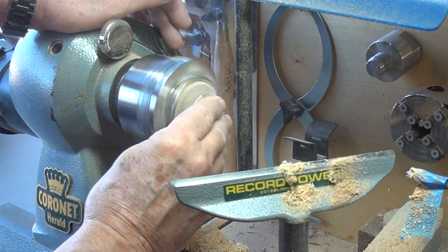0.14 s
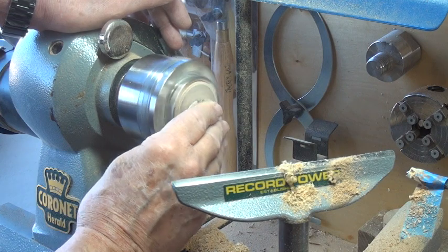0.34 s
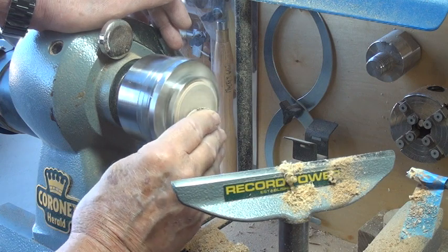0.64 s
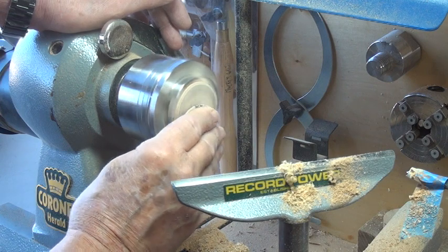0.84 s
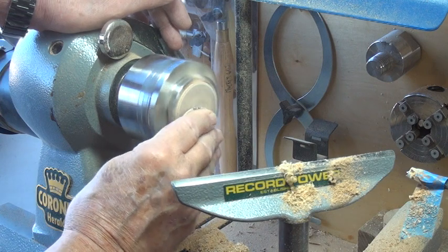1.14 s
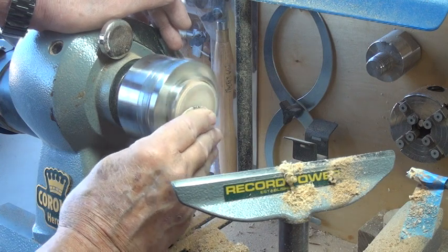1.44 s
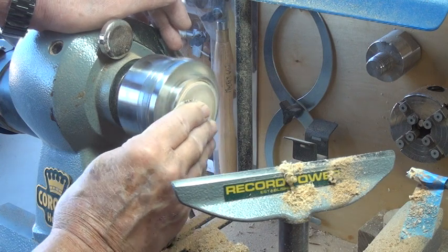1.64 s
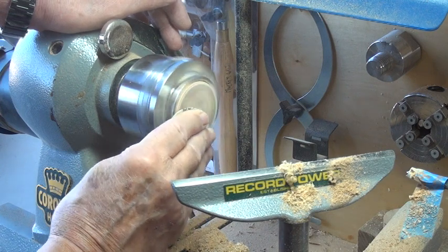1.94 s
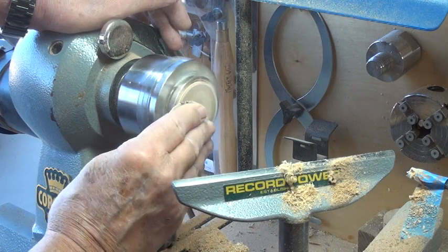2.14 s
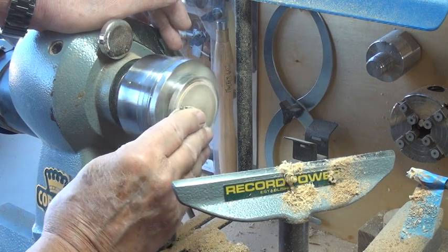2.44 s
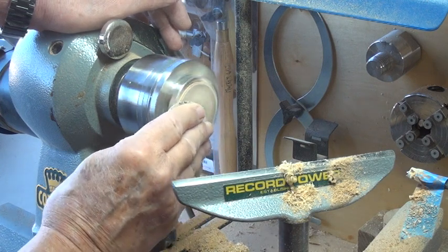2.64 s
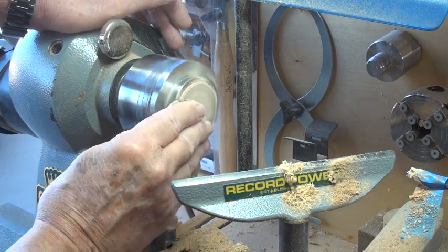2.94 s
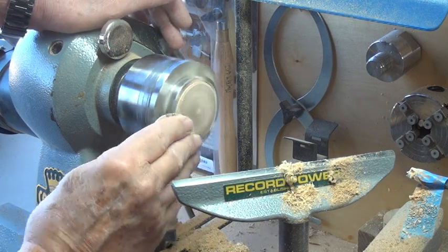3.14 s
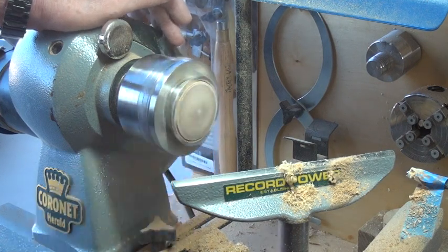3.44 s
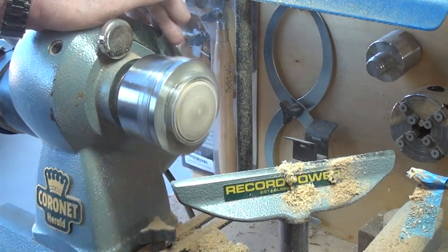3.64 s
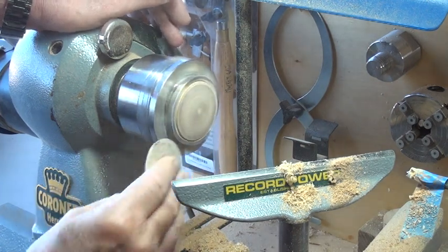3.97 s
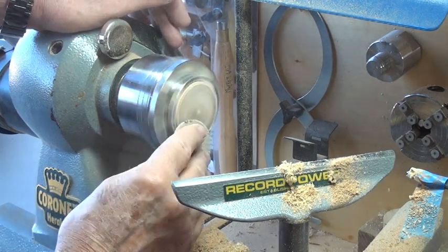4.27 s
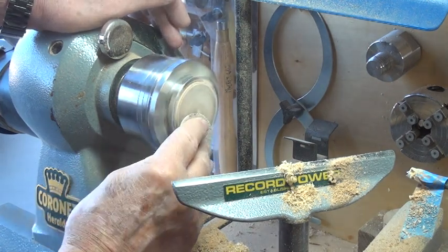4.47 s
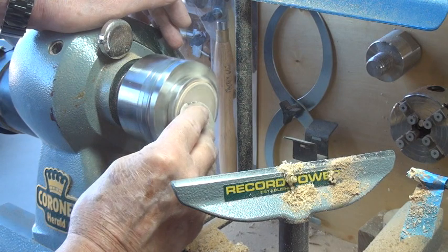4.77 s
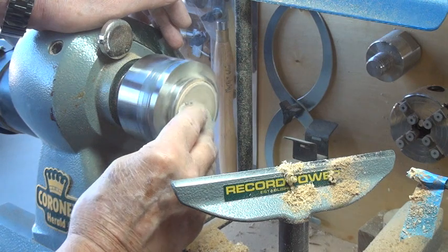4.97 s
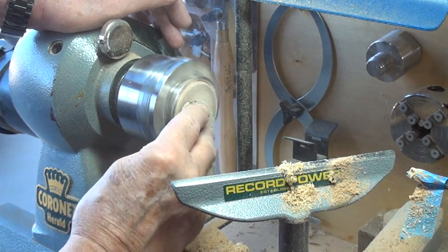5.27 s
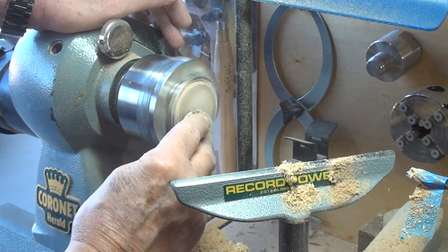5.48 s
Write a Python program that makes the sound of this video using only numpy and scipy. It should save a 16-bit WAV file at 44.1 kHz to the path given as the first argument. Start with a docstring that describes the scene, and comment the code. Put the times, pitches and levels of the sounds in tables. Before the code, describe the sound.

A wood lathe runs for the whole five and a half seconds or so, close and nearly straight ahead in a workshop with slight reflections. Its steady motor hum mixes with a fast belt throb, a rush of bearings, a light buzz and a thin, very high whistle. From the start, sandpaper scrapes against the spinning wood with a bright, dry hiss. It rasps harder and catches briefly on the grain right at the beginning, around 0.8 to 1.6 seconds, near 2.6 seconds and again at 3.1 seconds. At about 3.2 seconds the paper lifts off and only the lathe is heard, its pitch barely changing. At about 4.3 seconds the paper comes back with a slightly higher, more ringing hiss, swelling gently a few times and continuing to the end.

```python
"""Sanding wood on a lathe

A hand holds abrasive paper against a small piece of wood spinning on a belt-driven lathe. The motor hums
at harmonics of its shaft speed, its brushes buzz and its controller whistles; belt slaps and rolling
bearings excite the iron headstock. Grit snapping on wood fibres drives the resonances of the paper,
which scrapes on, is pressed harder a few times, lifts off for a second and comes back."""
import sys
import numpy as np
from scipy import signal
from scipy.fft import rfft, irfft, next_fast_len
from scipy.io import wavfile

SR = 44100
rng = np.random.default_rng(int(sys.argv[2]) if len(sys.argv) > 2 else 0)


def generate_wav(signal):
    """Clip the signal to [-1, 1] and save it as 16-bit WAV at the path in sys.argv[1]."""
    frames = np.transpose(np.atleast_2d(signal))
    scaled = np.clip(frames, -1, 1) * 32767
    pcm = np.round(scaled).astype(np.int16)
    wavfile.write(sys.argv[1], SR, pcm)


N = 247401
T = np.arange(N) / SR
HZ = np.fft.rfftfreq(N, 1 / SR)
MOTOR_HZ, SPINDLE_HZ, BELT_LAP_S = 25.387, 30.4, .2724


def amp(db):
    """Amplitude ratio of a level in decibels."""
    return 10 ** (np.asarray(db) / 20)


def unit_rms(x):
    """Normalisation to an rms of 1."""
    return x / np.sqrt(np.mean(x ** 2) + 1e-20)


def spectrum(points):
    """Spectral envelope: (Hz, dB) points interpolated over log frequency."""
    hz, db = np.transpose(points)
    return amp(np.interp(np.log(HZ + 1), np.log(hz), db))


def resonances(rows):
    """Power sum of steep-skirted peaks, each given as (Hz, width in Hz, dB)."""
    peaks = (amp(db) / (1 + ((HZ - hz) / width) ** 2 * np.sqrt(np.e)) for hz, width, db in rows)
    return np.sqrt(sum(peak ** 2 for peak in peaks))


def colour(drive, gain):
    """Source and filter: a white drive of rms 1 takes on the given level per Hz."""
    return irfft(rfft(drive) * gain, N) * np.sqrt(SR / 2)


def wander(rate_hz):
    """Low-pass noise of rms 1: a random fluctuation up to about the given rate."""
    t = np.arange(0, N / SR + 1, 1 / 1000)
    hz = np.fft.rfftfreq(len(t), t[1])
    lowpass = np.exp(-(hz / rate_hz) ** 2) * (hz > 0)
    slow = irfft(rfft(rng.standard_normal(len(t))) * lowpass, len(t))
    return unit_rms(np.interp(T, t, slow))


def tone(cycles, db):
    """A sinusoid of given rms level and random phase that follows a running count of cycles."""
    return amp(db) * np.sqrt(2) * np.sin(2 * np.pi * (cycles + rng.random()))


def swell(t, half_width):
    """Gaussian envelope of height 1 around t = 0."""
    return np.exp(-(t / half_width) ** 2)


def stroke(start, end, attack_s, decay_s):
    """Linear attack, a hold until the end, then exponential decay."""
    return np.clip((T - start) / attack_s, 0, 1) * np.exp(-np.maximum(T - end, 0) / decay_s)


# The lathe races when the paper lifts, then the controller reins it in.
# Each row: time in seconds, speed above normal in percent.
SPEED_CURVE = [(0, -.07), (.3, 0), (.55, .17), (1.2, 0), (3.1, 0), (3.4, .44), (3.7, 0), (4, -.21),
               (4.5, -.23), (4.75, 0), (5.05, .27), (5.6, .07)]

def shaft_clock(drift=.0001):
    """Phase is the integral of speed: the shaft's own time runs ahead when the lathe speeds up."""
    percent = np.interp(T, *np.transpose(SPEED_CURVE))
    return T + np.cumsum(percent / 100 + drift * wander(rate_hz=3)) / SR


# Motor hum. Each row: multiple of the shaft speed, rms level in dB.
SHAFT_HARMONICS = [(4, -69.5), (6, -68.5), (8, -59.5), (10, -60), (11, -58), (12, -52.5), (20, -58),
                   (24, -48), (30, -55.5), (32, -50.3), (36, -48.7), (64, -53.5), (96, -51.3)]
# Further steady tones of the running lathe (motor, belt, brushes).
# Each row: frequency in Hz, rms level in dB.
LATHE_TONES = [(64.2, -73), (152.3, -67), (242.1, -57.5), (277.3, -64.5), (440.6, -56.5), (462, -55),
               (1070.6, -52.5), (1258, -55.5), (2336, -60), (2670, -59), (4671, -53)]

def motor(clock, waver=.08):
    """Rotating parts radiate tones proportional to their common speed; each wavers in strength."""
    partials = [(order * MOTOR_HZ, db) for order, db in SHAFT_HARMONICS] + LATHE_TONES
    return sum(tone(hz * clock, db) * (1 + waver * wander(rate_hz=18)) for hz, db in partials)


# Resonances of the motor's brushes. Each row: frequency in Hz, width in Hz, level in dB per Hz.
BRUSH_MODES = [(4720, 25, -75), (5010, 45, -74), (7300, 140, -80)]

def brushes(clock, squeak_order=288, squeak_floor=.12, chafe_depth=.32):
    """Periodic friction: twice a turn the brushes squeak and chafe on a worn stretch of commutator."""
    pass_hz, worn_phase, half_width_s = 2 * MOTOR_HZ, .525, .0038
    from_worn_s = ((pass_hz * clock - worn_phase + .5) % 1 - .5) / pass_hz
    worn = np.exp(-(from_worn_s / half_width_s) ** 4)
    squeak = tone(squeak_order * MOTOR_HZ * clock, db=-46.5) * (squeak_floor + (1 - squeak_floor) * worn)
    chafe = unit_rms(1 - chafe_depth + chafe_depth * worn) * rng.standard_normal(N)
    return squeak + colour(chafe, resonances(BRUSH_MODES))


# The belt beats three times a lap, with the same slaps in each beat. Each row: time into the beat in
# seconds, ring frequency in Hz, half-width in seconds, level in dB in the first, second and third beat.
BELT_SLAPS = [(.0122, 608, .0052, -44, -43.4, -38.7), (.02394, 605, .0101, -42.8, -38.4, -38.4),
              (.04148, 611, .007, -33.2, -36.2, -34), (.06061, 556, .0112, -41, -40.1, -41),
              (.07054, 587, .0056, -35.4, -36, -38.5), (.08417, 579, .0065, -39.1, -43.3, -39)]

def belt(clock, waver=.043):
    """Impact excitation: each slap of the belt rings the headstock briefly, making a rolling throb."""
    beat_s, out = BELT_LAP_S / 3, np.zeros(N)
    for at, hz, half_width, *levels_db in BELT_SLAPS:
        beat, t = np.divmod(clock - at + beat_s / 2, beat_s)
        t = t - beat_s / 2
        strength = amp(levels_db)[beat.astype(int) % len(levels_db)]
        out += strength * swell(t, half_width) * np.sqrt(2) * np.cos(2 * np.pi * hz * t)
    return out * (1 + waver * wander(rate_hz=18))


# Rush of the running lathe. Each row: frequency in Hz, level in dB per Hz.
RUSH_SPECTRUM = [(25, -112), (45, -103), (110, -85), (140, -94.5), (175, -80), (260, -72), (345, -76),
                 (480, -68.5), (700, -69.5), (1000, -70), (1270, -68.5), (1410, -71.5), (2200, -76),
                 (4800, -81), (7000, -81.5), (8500, -88.5), (13400, -88.5), (14300, -110)]
# Resonances of the headstock. Each row: frequency in Hz, width in Hz, level in dB per Hz.
HEADSTOCK_MODES = [(392, 16, -70), (607, 66, -65.5), (758, 17, -65), (1132, 12, -67.5), (1323, 11, -66),
                   (1795, 67, -65.5), (1886, 45, -67), (2010, 35, -75), (2797, 61, -68), (9900, 300, -92)]

def bearings(belt_below_hz=620, belt_share=.49):
    """Rolling contact drives the headstock with noise; the belt's share, in the bass, repeats each lap."""
    gain = np.hypot(spectrum(RUSH_SPECTRUM), resonances(HEADSTOCK_MODES))
    repeating = belt_share / (1 + (HZ / belt_below_hz) ** 4)
    lap_noise = np.resize(rng.standard_normal(round(BELT_LAP_S * SR)), N)
    rolling = rng.standard_normal(N)
    return colour(lap_noise, gain * np.sqrt(repeating)) + colour(rolling, gain * np.sqrt(1 - repeating))


# Side tones of the whistle. Each row: offset in multiples of the shaft speed, rms level in dB.
WHISTLE_SIDEBANDS = [(-36, -67), (-2, -68), (2, -68), (24, -69), (32, -58), (36, -66), (48, -66)]
# The whistle dips briefly. Each row: time in seconds, change of level in dB.
WHISTLE_DIPS = [(3.34, -1), (3.8, -1.3), (4.68, -5), (5.26, -3)]

def controller(clock, switching_hz=12004, drift_hz=.88, level_db=-40, waver_db=.26, pan=.067):
    """The speed controller whistles at its switching rate, with sidebands spaced by shaft harmonics."""
    cycles = np.cumsum(switching_hz + drift_hz * wander(rate_hz=2.9)) / SR
    dips_db = sum(db * swell(T - at, half_width=.068) for at, db in WHISTLE_DIPS)
    carrier = tone(cycles, level_db + waver_db * wander(rate_hz=8.3) + dips_db)
    sidebands = sum(tone(cycles + order * MOTOR_HZ * clock, db) for order, db in WHISTLE_SIDEBANDS)
    return (carrier + sidebands) * np.array([[1 - pan / 2], [1 + pan / 2]])


# The paper is on the wood. Each row: touch in seconds, lift in seconds.
CONTACTS = [(-.1, 3.17), (4.255, 5.7)]
# The hand presses harder. Each row: start in seconds, hold in seconds, extra scraping in dB,
# rasp level in dB per Hz.
HAND_PRESSES = [(0, 0.24, 2, -76.5), (0.788, 0.041, 2, -88), (1.04, 0.34, 1.4, -87), (1.397, 0.12, 4, -74),
                (1.522, 0.13, 1.7, -78), (2.125, .22, 1, -81), (2.446, 0.28, 1, -81),
                (2.532, 0.074, 3, -74), (3.05, 0.061, 3.2, -71), (4.25, 0.039, 1, -90),
                (4.552, 0.13, 2, -86), (4.955, 0.065, 1.5, -92), (5.1, 0.087, 2.3, -90),
                (5.41, 0.29, 1, -83)]

def hand(light_db=-4, settle_s=.19, resting_db=-.4, tremor_db=.28):
    """Friction noise grows with normal force: gains for contact, force and the bite of each press."""
    contact, bite = np.zeros(N), np.zeros(N)
    for touch, lift in CONTACTS:
        settling = amp(light_db * np.exp(-abs(T - touch) / settle_s))
        contact += stroke(touch, lift, attack_s=.012, decay_s=.05) * settling
    force_db = resting_db + tremor_db * wander(rate_hz=14)
    for start, hold, extra_db, rasp_db in HAND_PRESSES:
        press = stroke(start, start + hold, attack_s=.02, decay_s=.04)
        force_db += extra_db * press
        bite += amp(rasp_db) * press
    return contact, amp(force_db), bite


def scrape(snaps_per_s=2500, spread_db=3, snap_share=.23, off_centre=.055, oval=.03, buzz=.015):
    """Shot noise of grit catching on fibres, amplitude-modulated as the off-centre, oval work turns."""
    sizes = amp(spread_db * np.minimum(rng.exponential(1, N), 4.5)) * rng.choice([-1, 1], N)
    snaps = unit_rms(sizes * (rng.random(N) < snaps_per_s / SR))
    # Countless tinier snaps merge into Gaussian noise.
    drive = np.sqrt(snap_share) * snaps + np.sqrt(1 - snap_share) * rng.standard_normal(N)
    angle = 2 * np.pi * SPINDLE_HZ * T
    pulsing = 1 + off_centre * np.cos(angle) + oval * np.cos(2 * angle)
    pulsing += buzz * np.cos(2 * np.pi * 2 * MOTOR_HZ * T)
    flutter_db = .65 * wander(rate_hz=130)
    return drive * pulsing * amp(flutter_db)


# The paper rings under flat fingers, then under a fingertip. Each row: start in seconds, end in seconds,
# frequency in Hz, width in Hz, level in dB per Hz.
GRIP_MODES = [(-.7, 3.6, 4490, 70, -73.5), (.45, 1.55, 2820, 55, -69), (.55, 1.45, 3530, 330, -72.5),
              (.6, 1.9, 4000, 800, -77), (4.3, 6.1, 5020, 110, -71.5), (4.4, 5.8, 5220, 90, -69.5),
              (4.4, 6.1, 5510, 70, -71), (4.4, 6.1, 5870, 70, -72.5), (4.2, 6.1, 6520, 180, -72),
              (4.3, 6.2, 7000, 700, -77.5), (4.3, 6.1, 3980, 110, -75), (4.5, 5.8, 2150, 500, -74)]

def paper_ring(fade_share=.34, pitch_drift=.004):
    """Boundary conditions set pitch: the sheet's free edge rings at modes that shift with the grip."""
    edge, out = scrape(), np.zeros(N)
    drift_s = np.cumsum(pitch_drift * wander(rate_hz=4.9)) / SR
    for start, end, hz, width, db in GRIP_MODES:
        inside = np.minimum(T - start, end - T) / (end - start)
        held = np.clip(2 * inside / fade_share, 0, 1)
        ring = colour(edge, resonances([(hz, width, db)]))
        analytic = signal.hilbert(ring, next_fast_len(N))[:N]
        out += np.sqrt(held) * (analytic * np.exp(2j * np.pi * hz * drift_s)).real
    return out


# Hiss of the grit on the wood. Each row: frequency in Hz, level in dB per Hz.
GRIT_SPECTRUM = [(900, -101), (2000, -86.5), (3000, -77.5), (4400, -75), (5400, -75), (6400, -72),
                 (7200, -74), (7900, -76.8), (10000, -75), (14100, -75.5), (14700, -97)]
# Resonances of paper and workpiece. Each row: frequency in Hz, width in Hz, level in dB per Hz.
PAPER_MODES = [(2840, 32, -69), (3430, 57, -73.5), (6300, 280, -74), (6720, 220, -71)]

def sanding(rasp_hz=3800, rasp_width_hz=1840):
    """Forced vibration: scraping sounds through the paper's resonances, and pressing adds a rasp."""
    contact, force, bite = hand()
    hiss = force * colour(scrape(), np.hypot(spectrum(GRIT_SPECTRUM), resonances(PAPER_MODES)))
    rasp = bite * colour(scrape(), resonances([(rasp_hz, rasp_width_hz, 0)]))
    return (hiss + rasp + paper_ring()) * contact


# The paper snags on rough grain, and ticks and rings as it lets go just before lifting off at 3.17 s. # Each
# row: centre time in seconds, frequency in Hz, width in Hz, level in dB per Hz, length in seconds.
SNAGS_AND_TICKS = [(.175, 3750, 1000, -71, .03), (.76, 3500, 800, -69, .024), (.935, 2870, 150, -65.5, .022),
                   (.965, 3400, 350, -68, .006), (1.029, 3700, 1200, -66, .007), (1.085, 5800, 1300, -67, .004),
                   (1.097, 3100, 400, -66, .008), (1.425, 4800, 2200, -67.5, .013),
                   (1.46, 6600, 900, -65.5, .008), (1.477, 5600, 2000, -68.5, .014),
                   (1.553, 2900, 200, -63.5, .008), (2.575, 2870, 250, -65, .023), (2.715, 2860, 250, -65, .02),
                   (3.08, 4200, 3200, -69.5, .006), (3.116, 2300, 1700, -63, .004),
                   (3.122, 2780, 400, -64, .009), (3.157, 3800, 3000, -73, .007),
                   (4.625, 4000, 500, -68.5, .018), (5.457, 4700, 1400, -74, .03)]

def snags_and_ticks():
    """Local resonance: each snag or tick is a short rasp at the pitch of the part of the sheet that sounds."""
    drive, out = scrape(), np.zeros(N)
    for at, hz, width, db, length in SNAGS_AND_TICKS:
        out += swell(T - at, length / np.sqrt(2)) * colour(drive, resonances([(hz, width, db)]))
    return out


def sheet_radiation(x, cutoff_hz=900, t60=.11, echo_db=-15):
    """A small sheet radiates little bass; echoes off chuck and tool rest interfere, carving fine peaks."""
    direct = signal.sosfilt(signal.butter(2, cutoff_hz, "highpass", fs=SR, output="sos"), x)
    t = np.arange(SR // 16) / SR
    taps = rng.standard_normal(len(t)) * amp(-60 * t / t60) * (t > .001)
    echoes = amp(echo_db) * signal.fftconvolve(direct, taps / np.linalg.norm(taps))[:N]
    return (direct + echoes) / np.hypot(1, amp(echo_db))


# Stereo width. Each row: frequency in Hz, level of side relative to mid in dB.
SIDE_SPECTRUM = [(30, -15), (110, -33), (320, -47), (480, -15), (620, -21), (1200, -14.5), (1850, -12),
                 (2800, -14.5), (4800, -13), (9000, -12), (14000, -14)]

def wall_scatter(x, t60=.21):
    """Decorrelation: scatter from the workshop walls arrives left and right with random phase."""
    t = np.arange(SR // 4) / SR
    scatter = rfft(rng.standard_normal(len(t)) * amp(-60 * t / t60), N)
    return irfft(rfft(x) * scatter / abs(scatter) * spectrum(SIDE_SPECTRUM), N)


def scene(balance_db=.17):
    """Superposition of lathe and paper, nearly straight ahead and a little to the right."""
    clock = shaft_clock()
    lathe = motor(clock) + brushes(clock) + belt(clock) + bearings()
    mid = lathe + sheet_radiation(sanding() + snags_and_ticks())
    side = wall_scatter(mid)
    left, right = (mid + side) * amp(-balance_db), (mid - side) * amp(balance_db)
    return np.array([left, right]) + controller(clock)


def record(dry):
    """Band limiting: a linear-phase low-pass filter removes the highest treble."""
    lowpass = signal.firwin(301, cutoff=14750, window=("kaiser", 9), fs=SR)
    return signal.oaconvolve(dry, lowpass[None], "same")


dry = scene()
out = record(dry)
generate_wav(out)
```